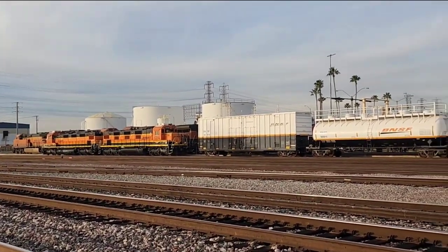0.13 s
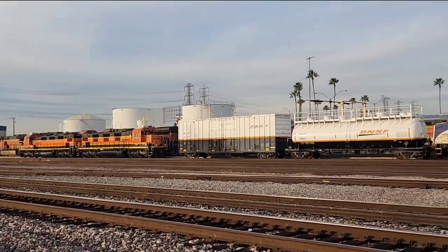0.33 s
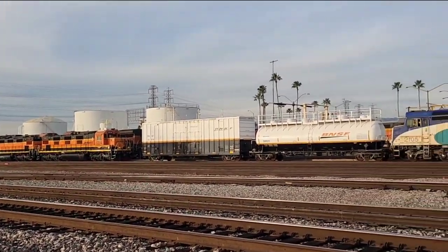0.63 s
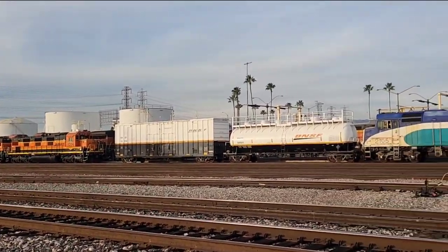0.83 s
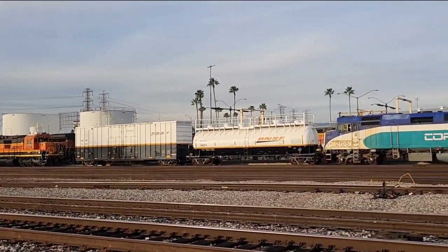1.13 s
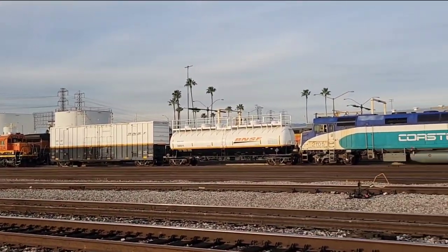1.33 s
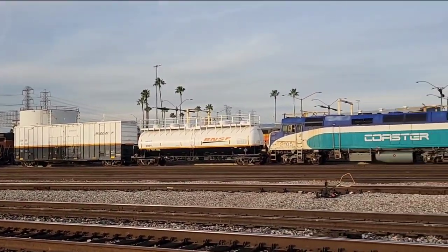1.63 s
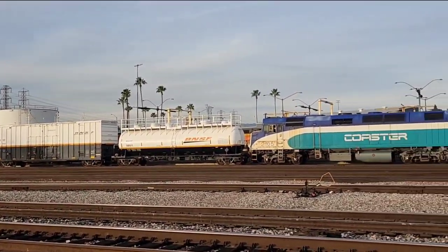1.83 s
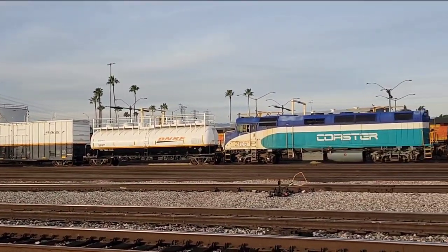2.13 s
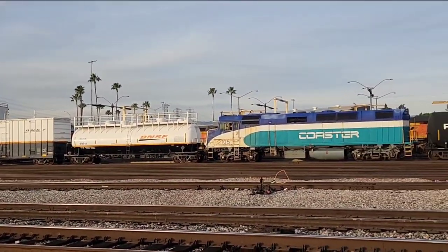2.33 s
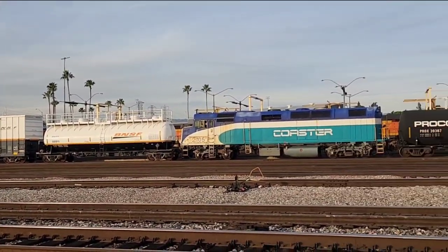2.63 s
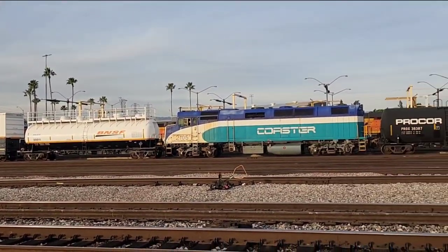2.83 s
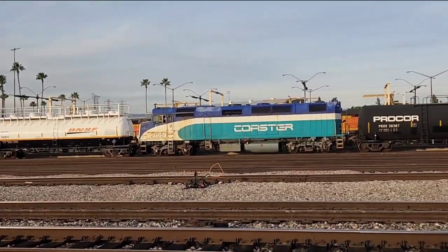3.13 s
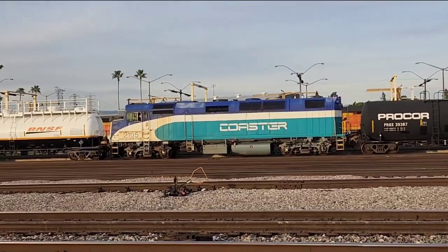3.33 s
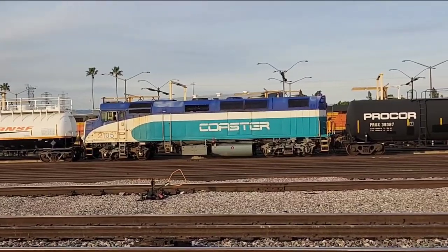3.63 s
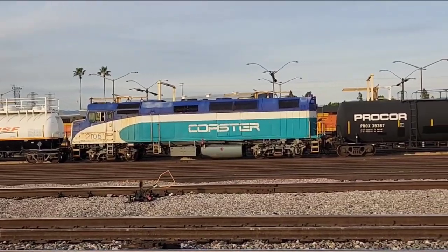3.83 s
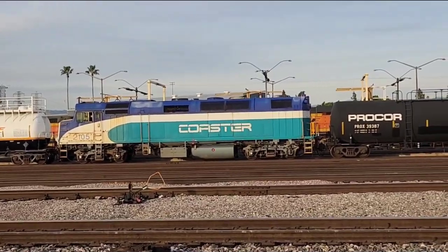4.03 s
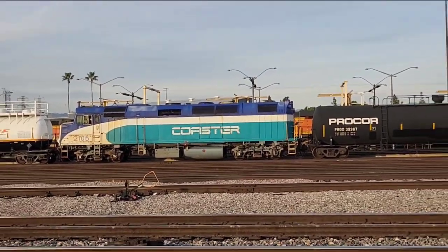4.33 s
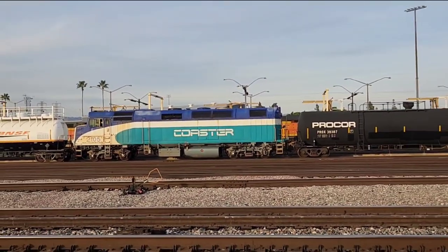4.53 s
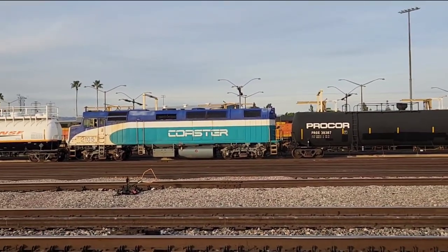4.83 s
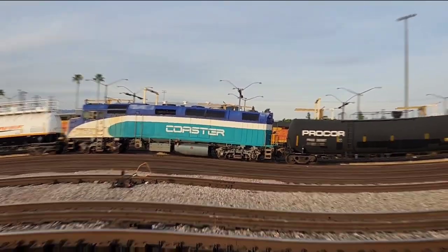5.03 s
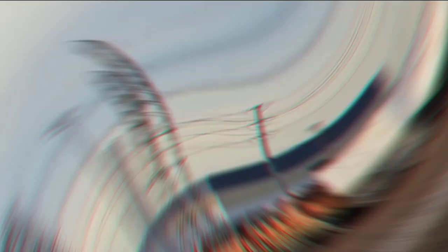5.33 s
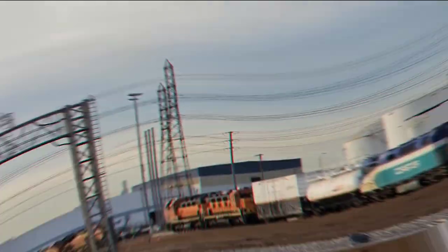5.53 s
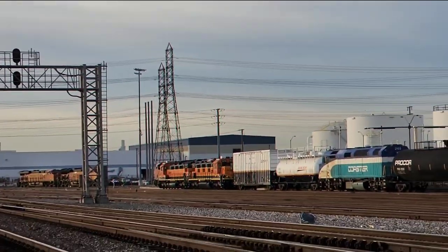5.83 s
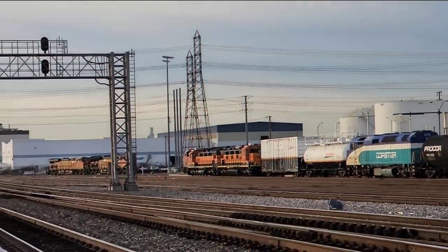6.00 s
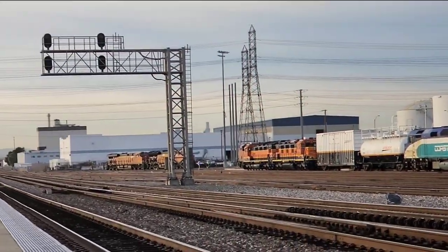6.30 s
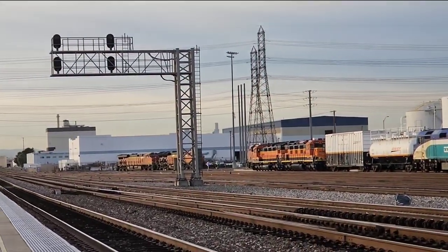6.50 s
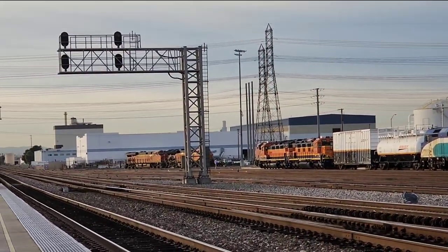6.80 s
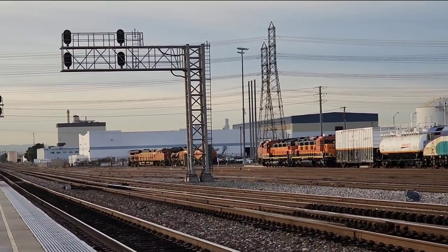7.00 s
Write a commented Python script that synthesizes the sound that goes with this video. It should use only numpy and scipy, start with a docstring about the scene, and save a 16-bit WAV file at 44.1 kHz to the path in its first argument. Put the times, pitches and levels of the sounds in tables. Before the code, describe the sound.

Handheld stereo camera near slow freight locomotives. Heavy low exhaust surges and lulls beneath wheel noise and a bright air leak, with brake rubbing and three hoarse air dryer spits. Around five and a half seconds the sound snaps almost silent for an instant, then resumes without the leak: a fading horn echo, running gear knocks, receding rumble and one crisp handling tick.

```python
"""A freight train rolls slowly through a yard close by: diesel tones and roar throb over coloured wheel noise.
A squeak and a rub of brake shoes open it; noise jets make an air leak and three air dryer spits, fans swell,
and a wheel flange, narrow-band noise, sings faintly. At 5.4 s the sound breaks off for an instant and the scene
changes: the leak is gone, the train draws away, sine partials of a horn echo die across the yard, knocks of the
running gear go on, and something ticks on the camera body by the right microphone port."""
import sys
import numpy as np
from scipy import signal
from scipy.fft import rfft, irfft
from scipy.io import wavfile
from scipy.ndimage import uniform_filter1d, minimum_filter1d

SR = 44100
rng = np.random.default_rng(int(sys.argv[2]) if len(sys.argv) > 2 else 0)


def to_wav(sig):
    """Store sig (one row per channel, or 1-D mono) as 16-bit WAV at the path in sys.argv[1].

    Samples outside -1..1 are clipped; the rate is SR.
    """
    pcm = np.clip(np.atleast_2d(sig), -1, 1) * 32767
    pcm = np.round(pcm).astype(np.int16)
    wavfile.write(sys.argv[1], SR, pcm.T)  # frames by channels


N = 315756
T, HZ = np.arange(N) / SR, np.fft.rfftfreq(N, 1 / SR)

BREAK_S, RESUME_S = 5.4048, 5.438
EDGE_HZ = 14800  # upper band limit

# All colours below are relative spectra; the sources set their own levels.
# Tick on the camera body. Each row: frequency in Hz, density in dB per Hz.
TICK_COLOUR = [(3000, -5), (5000, 4), (7500, -1), (9500, -4), (12000, -2), (14500, -10)]
TICK_S, TICK_DB, TICK_RISE_S, TICK_T60_S = 6.162, -43, .002, .03

# Faint thin treble hiss, strongest near 4.5 kHz, with a second peak near 9.4 kHz. Each row: frequency in Hz,
# density in dB per Hz.
THIN_HISS_COLOUR = [(4500, 12), (6000, -24), (7400, -9), (8000, -7.5), (8600, -13), (9400, -0.5),
                    (9800, -10), (10500, -21)]
THIN_HISS_DB, THIN_HISS_FADES_S, THIN_HISS_FADE_DB_PER_S = -52.5, 5.93, 26

# Partials of the horn chord across the yard.
# Each row: frequency in Hz, loudest moment in seconds, rms level there in dB before waver, t60 in seconds.
HORN = [(265, 5.46, -39.5, 2.2), (310, 5.53, -34, 1), (364, 5.47, -34, .9), (465, 5.55, -42, 1.5),
        (510, 5.5, -40, 1.3), (533, 5.55, -40.5, 1.2), (548, 5.53, -42, .8), (627, 5.53, -32, .7),
        (732, 5.7, -42, .8), (808, 5.46, -38.5, 1), (936, 5.48, -32, .6), (948, 5.64, -38.5, .9),
        (1010, 5.47, -41, 1), (1048, 5.55, -34.5, .85), (1090, 5.5, -41, .7), (1260, 5.68, -46, 1.2),
        (1310, 5.47, -35, .7), (1394, 5.64, -36, .75), (1445, 5.56, -40.5, 1), (1500, 5.56, -44, .6),
        (1542, 5.6, -45, .7), (1567, 5.55, -37.5, .55), (1660, 5.55, -46, .7), (1835, 5.48, -38, .35),
        (1878, 5.49, -39, .55), (1890, 5.69, -46, .9), (2095, 5.55, -50, 1), (2160, 5.55, -48, 1),
        (2340, 5.52, -50, 1)]
HORN_RISE_DB_PER_S, HORN_SMEAR_RADIANS = 48, .5

# Steady leak of compressed air. Each row: frequency in Hz, density in dB per Hz.
LEAK_COLOUR = [(900, -11), (1800, 3.5), (2600, 1.5), (3100, 1.5), (3900, -0.5), (4900, -0.5), (5500, -2),
               (6100, -3), (6900, -7), (7400, -5), (8400, -9.5), (9200, -22.5), (10000, -43.5)]
# Whistles within the leak. Each row: frequency in Hz, width in Hz, lift in dB.
LEAK_WHISTLES = [(4350, 47, 0), (4770, 100, 4), (5650, 180, 3.5), (7480, 120, 3)]
LEAK_DB, LEAK_GROWTH_DB_PER_S = -38.5, 0.09  # slowly coming closer

# Air dryer jets. Each row: frequency in Hz, density in dB per Hz.
SPIT_COLOUR = [(300, -25.5), (800, -4.5), (1800, 2.5), (2500, 0.5), (3500, 2.5), (4200, -0.5), (5200, -3),
               (6000, -7), (6800, -8.5), (8200, -8.5), (9300, -26), (10400, -46)]
# Air dryer spits. Each row: full flow in seconds, rise from about -10 dB in seconds, hold in seconds,
# t60 in seconds, jet level in dB, tilt in dB per octave, nozzle in Hz, glide in octaves per second,
# nozzle level in dB against the jet.
SPITS = [(0.395, 0.036, 0.035, 0.88, -31.5, 9, 5360, -.5, -5),
         (1.852, 0.12, 0.079, 0.61, -29.5, -4.5, 5085, .2, -8.5),
         (3.237, .08, 0.079, 1.33, -31, 0, 4750, -.5, -9)]
NOZZLE_WIDTH_HZ = 960
SPATTER_DB, SPATTER_PER_S = 1.4, 170
# Very high hiss at the height of the first spit. Each row: frequency in Hz, density in dB per Hz.
HIGH_HISS_COLOUR = [(8000, -2), (10000, 2), (12500, -1), (13300, -26)]
HIGH_HISS_S, HIGH_HISS_HALF_S, HIGH_HISS_DB = 0.426, 0.022, -51

# Knocks of the running gear.
# Each row: start in seconds, push in dB, rattle in dB, centre in Hz, rattle t60 in seconds.
KNOCKS = [(2.816, -13, -37, 310, .1), (3.61, -37, -37, 582, .2), (4.594, -29, -41, 221, 0.074),
          (5.84, -22, -24, 144, 0.32), (6.14, -37, -30, 310, 0.24)]
RATTLE_RISE_S = .006

# Brake shoes. Each row: frequency in Hz, density in dB per Hz.
RUB_COLOUR = [(1000, -11), (1350, 3), (1650, 1.5), (2050, 3), (2500, -4), (4000, -13), (5500, -18),
              (7000, -16.5), (9000, -35.5), (10000, -61.5)]
# Rubs of the brake shoes. Each row: loudest moment in seconds, half length in seconds, level in dB.
RUBS = [(0, .12, -28), (.35, 0.64, -33), (2.1, 0.75, -40.5)]
# Singing flange. Each row: time in seconds, level in dB.
SINGS = [(0, -59), (.55, -53), (1, -43.5), (1.7, -42), (2.05, -40.5), (2.4, -38), (2.78, -41), (3, -48),
         (3.3, -48), (3.7, -62.5), (4.8, -58), (5.4, -70)]
SQUEAK_S, SQUEAK_HALF_S, SQUEAK_DB = .08, .042, -40
SQUEAK_HZ, SQUEAK_OCTAVES_PER_S = 7200, 3.6  # pitch at the loudest moment, and its climb

# Radiator fans of the nearest locomotive: grow until they are abreast, then hold.
FANS_DB, FANS_ABREAST_S, FANS_GROWTH_DB_PER_S = -41, 1.6, 14.5

# Drone of the engine housings. Each row: frequency in Hz, density in dB per Hz.
DRONE_COLOUR = [(70, -1), (88, -2), (105, -4), (135, -6), (160, -11), (200, -17.5), (260, -23)]
# Heavy cars shaking the ground. Each row: frequency in Hz, density in dB per Hz.
SHUDDER_COLOUR = [(8, -22), (20, -15), (26, -5.5), (31, -2.5), (42, 4), (46, -10.5)]
# Heavy wheel trucks rolling past. Each row: abreast in seconds, half length in seconds, weight from 0 to 1.
TRUCKS = [(1.472, .3, 0.1), (3.42, .1, 0.6), (3.7, 0.48, 0.3)]
# Running levels of the housings. In order: abreast in dB, drawing away in dB, lift under a heavy truck in dB.
DRONE_DB = (-30, -25.5, 5)
# Running levels of the ground shudder. In order: abreast in dB, drawing away in dB, truck lift in dB.
SHUDDER_DB = (-29, -23.5, 4)
# Running levels of the wheels, before the gain in scene(). In order: abreast in dB, drawing away in dB,
# truck lift in dB.
ROLL_DB = (-38, -32, 4)

# Wheels and machinery abreast. Each row: frequency in Hz, density in dB per Hz.
ROLL_NEAR_COLOUR = [(150, -21), (200, -5.5), (250, 0.5), (370, -0.5), (460, -0.6), (620, 0.5), (710, -5.5),
                    (800, -3), (1020, -3), (1170, -7.5), (1330, -9), (1650, -7), (2000, -29.5),
                    (2600, -34.5)]
# Wheels and machinery drawing away. Each row: frequency in Hz, density in dB per Hz.
ROLL_FAR_COLOUR = [(150, -13), (230, -7), (350, -4), (410, -6), (540, 1), (760, -3), (950, -5),
                   (1300, -8.5), (1600, -7), (2500, -12.5), (3600, -15), (5000, -20), (5700, -33),
                   (7900, -37.5), (10000, -76)]
# Resonances of the cars abreast. Each row: frequency in Hz, width in Hz, lift in dB.
ROLL_NEAR_HUM = [(376, 48, 0.5), (507, 61, -1), (595, 9.7, -2.5), (758, 41, 4), (950, 32, -2)]
# Resonances of the cars drawing away. Each row: frequency in Hz, width in Hz, lift in dB.
ROLL_FAR_HUM = [(336, 140, 7), (490, 95, 1.5), (977, 69, 4.5), (1440, 130, 1.5)]

# Exhaust roar abreast. Each row: frequency in Hz, density in dB per Hz.
EXHAUST_NEAR = [(40, -14.5), (50, -1), (58, 0.5), (68, 2), (77, -4), (86, -11), (100, -19.5)]
# Exhaust roar drawing away. Each row: frequency in Hz, density in dB per Hz.
EXHAUST_FAR = [(40, -15), (50, -2), (66, 2.5), (75, -3), (86, -11), (100, -10.5)]
# Firing tones abreast. Each row: frequency in Hz, level in dB against the exhaust roar
# (for tones below STEADY_BELOW_HZ, level within the steady deep layer).
FIRING_NEAR = [(30.9, -14), (35.75, -11), (43.5, -12), (47.15, -10), (51.55, -10), (55, -10), (62.33, -5),
               (64.98, -3), (68.22, -6), (73.1, -3.5), (78, -9.5)]
# Firing tones drawing away. Each row: frequency in Hz, level in dB as above.
FIRING_FAR = [(25.8, -9), (37.1, -11), (46.8, -8), (50.2, -4), (55.2, -5), (58.45, -3), (66, -3),
              (74.05, -3.5)]
STEADY_BELOW_HZ = 49
THROB_DB, THROB_GROWTH_DB_PER_S = -19, 0.76
BEAT_HZ, BEAT_PEAK_S, BEAT_DB = 4.87, .187, 0.5
UNEVEN_DB, UNEVEN_PER_S = 1.5, 15
# Heaviest surges, when the exhausts fall into step. Each row: peak in seconds, lift in dB.
SURGES = [(.08, 7), (.19, 3.5), (.37, 6.5), (.81, 6), (.92, 9.5), (1.03, 3.5), (1.22, 2.5), (1.43, 9),
          (1.61, 3.5), (2.04, 10.5), (2.13, 5), (2.3, 2.5), (2.42, 2.5), (2.62, 4), (2.88, 7.5), (3.14, 7),
          (3.265, 12), (3.44, 4.5), (3.52, 3), (3.879, 6), (4.03, 3.5), (4.27, 5.5), (4.51, 4), (4.73, 3.5),
          (5.005, 5), (5.129, 6.5), (5.295, 8), (5.53, 5.5), (5.741, 3.5), (6.11, 4), (6.251, 9.5),
          (6.35, 5), (6.495, 6), (6.625, 8), (6.84, 4), (6.945, 6), (7.08, 4)]
# Deepest lulls, when the exhausts cancel. Each row: lowest moment in seconds, dip in dB.
LULLS = [(.528, -7), (.87, -5), (1.099, -14), (1.35, -12), (1.91, -11.5), (2.177, -7), (2.999, -2),
         (3.36, -6.5), (3.672, -7.5), (4.17, -4), (4.42, -8.5), (4.6, -4.5), (4.94, -4), (5.06, -4.5),
         (5.22, -4.5), (5.94, -5), (6.04, -6), (6.18, -4), (6.42, -4.5), (6.7, -9)]
SURGE_S, LULL_S = 0.034, 0.027  # half lengths
LULL_SHARE = 0.3  # sag on either side of a surge, as a share of its lift

# Likeness of the two channels abreast. Each row: frequency in Hz, likeness from 0 to 1.
LIKENESS_NEAR = [(25, 0.79), (70, 1), (130, 0.9), (250, 0.95), (500, 0.88), (700, .45), (1050, .3),
                 (1300, .55), (1650, 0.11), (3600, 0.25), (5500, 0.28), (9000, 0.13)]
# Likeness of the two channels drawing away. Each row: frequency in Hz, likeness from 0 to 1.
LIKENESS_FAR = [(250, 1), (500, 0.57), (1000, 0.55), (2300, 0.5), (3600, 0.6), (4700, 0.82), (5600, .25),
                (9000, .2)]
# Left microphone port over right, abreast. Each row: frequency in Hz, difference in dB.
PORTS_NEAR = [(60, 0.6), (550, 1), (800, 0.7), (1300, 1.5), (2000, 0.5), (3100, -0.5), (3900, -5.5),
              (4400, -12), (4800, -14.5), (5200, -15), (5800, -8.5), (6500, -4.5), (8100, -3), (8900, 4),
              (10500, -6)]
# Left port over right, drawing away. Each row: frequency in Hz, difference in dB.
PORTS_FAR = [(60, .6), (300, 1.2), (540, 2.9), (1000, 0.98), (2900, 1), (4400, 3.8), (4900, 11.7),
             (5600, 7.7), (6600, 16), (9000, 24.3)]
# Left port ahead of right, abreast. Each row: frequency in Hz, lead in radians.
LEAD_NEAR = [(20, .13), (60, .12), (130, -.02), (450, -.15), (650, -1), (900, -.2), (1100, -2.3),
             (1400, -3), (2100, -3.6), (2500, -6), (3000, -7), (3300, -4.7), (3850, -3.8), (4500, -5.2),
             (5500, -6.2), (6200, -5.9), (7300, -4), (8500, -2.9)]
# Left port ahead of right, drawing away. Each row: frequency in Hz, lead in radians.
LEAD_FAR = [(20, .13), (60, .12), (130, -.05), (400, -.5), (1000, -1.3), (2240, -3), (4390, -7.5),
            (5250, -10), (7240, -14.4), (9000, -17)]


def amp(db):
    """Decibels to gain."""
    return 10 ** (np.asarray(db) / 20)


def read(points):
    """A spectrum joined by straight lines on a log-frequency axis."""
    hz, value = np.transpose(points)
    return np.interp(np.log(HZ + 1), np.log(hz + 1), value)


def shape(points):
    """A spectrum in dB that falls 48 dB per octave beyond its ends."""
    octaves_outside = np.abs(np.log2((HZ + 1) / np.clip(HZ + 1, points[0][0], points[-1][0])))
    return read(points) - 48 * octaves_outside


def ring(hz, width):
    """Response in dB of a steep resonance."""
    return -20 * np.log10(1 + (2 * (HZ - hz) / width) ** 2)


def bumps(rows):
    """Lift in dB from a set of resonances."""
    return sum(db / (1 + (2 * (HZ - hz) / width) ** 2) for hz, width, db in rows)


def level(curve):
    """A dB curve as a gain for every sample."""
    return amp(np.interp(T, *np.transpose(curve)))


def swell(s, half_s):
    """A smooth rise to 1 at time s, and fall."""
    return np.exp(-np.minimum(((T - s) / half_s) ** 2, 100))


def swells(rows):
    """Gain of separate swells whose powers add."""
    return np.sqrt(sum((amp(db) * swell(s, half_s)) ** 2 for s, half_s, db in rows))


def unit(x):
    """Scales to rms 1."""
    return x / np.sqrt(np.mean(x ** 2) + 1e-20)


def drift(rate):
    """Slow chance of rms 1, up to rate turns a second."""
    knots = rng.standard_normal(4096)
    return unit(np.interp(2 * rate * T, np.arange(len(knots)), knots))


def noise(colour_db, likeness=LIKENESS_NEAR):
    """Coloured stereo noise of rms 1, shared between the channels as far as the likeness says."""
    a, b = rfft(rng.standard_normal((2, N)))
    same = np.clip(read(likeness), -1, 1)
    right = same * a + np.sqrt(1 - same ** 2) * b
    return unit(irfft(np.array([a, right]) * amp(colour_db), N))


def steadied(x, smooth_s):
    """Evens out the chance swells of a low roar."""
    size = int(smooth_s * SR)
    power = uniform_filter1d(uniform_filter1d((x ** 2).mean(0), size), size // 2)
    return x / np.sqrt(power + 1e-6)


def running(near_db, far_db, truck_db):
    """Gain of a running noise: steady on each side of the break, lifted as heavy trucks pass."""
    load = sum(weight * swell(s, half_s) for s, half_s, weight in TRUCKS)
    return amp(np.where(T < RESUME_S, near_db + truck_db * load, far_db))


def tick(snap_db=4, snap_s=0.00028, tail_db=-19, tail_t60=.35, left_db=-15):
    """A crisp tick on the camera body: a brief scrape, a snap and a faint tail, weaker on the left."""
    age = np.maximum(T - TICK_S, 0)
    rise = swell(TICK_S, TICK_RISE_S) ** (T < TICK_S)
    scrape = amp(-60 * age / TICK_T60_S)
    tail = amp(tail_db - 60 * age / tail_t60)
    snap = amp(snap_db) * swell(TICK_S, snap_s)
    envelope = rise * (scrape + tail) + snap
    return noise(shape(TICK_COLOUR)) * envelope * amp([[TICK_DB + left_db], [TICK_DB]])


def thin_hiss():
    """A faint thin treble hiss, strongest near 4.5 kHz with a second peak near 9.4 kHz, that holds and then
    fades."""
    fade_db = THIN_HISS_FADE_DB_PER_S * np.maximum(T - THIN_HISS_FADES_S, 0)
    return noise(shape(THIN_HISS_COLOUR)) * amp(THIN_HISS_DB - fade_db)


def horn_echo(hold_s=0.066, waver_db=3.5, scatter_db=-36.0, scatter_t60=2.1):
    """Echoes from tanks and sheds cross: each partial crests in its own time and wavers over a scattered wash."""
    wash = noise(shape([(300, -16), (600, -6.0), (1100, 7.5), (1500, -1.5), (2000, 0), (2450, -17)]))
    out = wash * amp(scatter_db - 60 * np.maximum(T - RESUME_S - hold_s, 0) / scatter_t60)
    start = int(RESUME_S * SR)
    t = T[start:]
    knots_s = RESUME_S + np.arange(60) / 30
    for hz, crest_s, db, t60 in HORN:
        turns = hz * t + rng.random()
        arch_db = np.minimum(HORN_RISE_DB_PER_S * (t - crest_s), 60 * (crest_s - t) / t60)
        for port in out:  # each channel wavers on its own
            waver, phase = (np.interp(t, knots_s, k) for k in rng.standard_normal((2, len(knots_s))))
            tone = np.sqrt(2) * np.sin(2 * np.pi * turns + HORN_SMEAR_RADIANS * phase)
            port[start:] += tone * amp(db + arch_db + waver_db * waver)
    return out


def leak(flutter_db=.5):
    """Compressed air escapes as steady turbulent noise with fuzzy whistles."""
    hiss = noise(shape(LEAK_COLOUR) + bumps(LEAK_WHISTLES))
    return hiss * amp(LEAK_DB + LEAK_GROWTH_DB_PER_S * T + flutter_db * drift(22))


def spatter():
    """Drops of condensate break up a jet into coarse grains: a gain of rms 1."""
    return unit(amp(SPATTER_DB * drift(SPATTER_PER_S)))


def spits():
    """A valve opens, blows and dies away; its nozzle whistles hoarsely and glides with the pressure."""
    out = 0
    for s, rise, hold, t60, db, tilt_db, hz, glide, nozzle_db in SPITS:
        opening = np.exp(-(np.minimum(T - s, 0) / rise * 1.07) ** 2)
        flow = opening * amp(db - 60 * np.maximum(T - s - hold, 0) / t60)
        jet = noise(shape(SPIT_COLOUR) + tilt_db * np.log2(HZ + 1))
        whistle = signal.hilbert(noise(2 * ring(hz, 2 * NOZZLE_WIDTH_HZ)))
        # shift the whole whistle band along the glide
        shift_hz = hz * (2 ** (glide * np.clip(T - s, -rise, t60 / 2)) - 1)
        nozzle = (whistle * np.exp(2j * np.pi * np.cumsum(shift_hz) / SR)).real
        out = out + (jet + amp(nozzle_db) * nozzle) * flow * spatter()
    return out


def high_hiss():
    """A brief grainy burst of very high hiss at the first spit's height."""
    burst = noise(shape(HIGH_HISS_COLOUR)) * swell(HIGH_HISS_S, HIGH_HISS_HALF_S)
    return burst * amp(HIGH_HISS_DB) * spatter() ** 2


def knocks(spread=0.33, dull_db=15):
    """Couplers and trucks knock: one compact push, then a rattle in heavily damped steel."""
    out = 0
    for s, push_db, rattle_db, hz, t60 in KNOCKS:
        half_s = 1 / (np.pi * hz)
        push = (2 * ((T - s) / half_s) ** 2 - 1) * swell(s, half_s)
        steel_db = ring(hz, spread * hz) - dull_db * np.maximum(HZ / hz - 2, 0)
        peak_s = s + RATTLE_RISE_S
        rise = swell(peak_s, RATTLE_RISE_S) ** (T < peak_s)
        rattle = noise(steel_db) * rise * amp(-60 * np.clip((T - s) / t60, 0, 2))
        out = out + amp(push_db) * push + amp(rattle_db) * rattle
    return out


def brake_rub():
    """Brake shoes rub on the wheels: swells of rough friction noise."""
    return noise(shape(RUB_COLOUR)) * swells(RUBS)


def flange(hz=3570, width=335, waver_db=0.8):
    """One flange sings in a fuzzy wheel mode, a narrow band of wavering noise."""
    return noise(ring(hz, width)) * level(SINGS) * amp(waver_db * drift(24))


def squeak(roughness_per_s=170):
    """A wheel squeaks once: a rising sine, roughened by chance."""
    turns = np.cumsum(SQUEAK_HZ * 2 ** (SQUEAK_OCTAVES_PER_S * (T - SQUEAK_S))) / SR
    tone = drift(roughness_per_s) * unit(np.sin(2 * np.pi * turns))
    return tone * amp(SQUEAK_DB) * swell(SQUEAK_S, SQUEAK_HALF_S)


def fans(hz=970, width=420):
    """A broad roar from the radiator fans."""
    return noise(ring(hz, width)) * amp(FANS_DB - FANS_GROWTH_DB_PER_S * np.maximum(FANS_ABREAST_S - T, 0))


def drone(waver_db=0.2, lurch_db=4.5):
    """Low roar of the engine housings, and the ground shuddering under the cars."""
    housings = steadied(noise(shape(DRONE_COLOUR)), 0.079)
    housings = housings * running(*DRONE_DB) * amp(waver_db * drift(9.8))
    ground = steadied(noise(shape(SHUDDER_COLOUR)), 0.087)
    ground = ground * running(*SHUDDER_DB) * amp(lurch_db * drift(3.4))
    return housings + ground


def rolling(colour, hums, likeness, gain_db, flutter_db):
    """Rough wheels on rail excite the broad resonances of the cars."""
    roar = noise(shape(colour) + bumps(hums), likeness)
    return roar * running(*ROLL_DB) * amp(gain_db + flutter_db * drift(23))


def throb():
    """Gain of the exhaust: a regular beat, chance unevenness, surges with a sag on either side, and deep lulls."""
    beat = BEAT_DB * np.cos(2 * np.pi * BEAT_HZ * (T - BEAT_PEAK_S))
    surge = 0
    for s, db in SURGES:
        surge = surge + db * ((1 + LULL_SHARE) * swell(s, SURGE_S) - LULL_SHARE * swell(s, 3 * SURGE_S))
    lull = sum(db * swell(s, LULL_S) for s, db in LULLS)
    in_step = np.minimum(sum(swell(s, SURGE_S) for s, db in SURGES), 1)
    uneven = UNEVEN_DB * drift(UNEVEN_PER_S) * (1 - in_step)
    return amp(THROB_DB + THROB_GROWTH_DB_PER_S * T + beat + surge + lull + uneven)


def diesels(colour, firing, gain_db, smooth_s=0.11, deep_db=-21.5):
    """Firing tones beat inside the exhaust roar and follow the throb; the deepest hold steady beneath it."""
    beating, deep = noise(shape(colour)), 0
    for (hz, db), turn in zip(firing, rng.random(len(firing))):
        tone = amp(db) * unit(np.sin(2 * np.pi * (hz * T + turn)))
        if hz < STEADY_BELOW_HZ:
            deep = deep + tone
        else:
            beating = beating + tone
    return (steadied(beating, smooth_s) * throb() + amp(deep_db) * deep) * amp(gain_db)


def reflected(x, echo=0.34, latest_s=.04, across_s=.0004, count=14):
    """Ballast, rails and car sides send early echoes that ripple the spectrum, a little apart at the two ears."""
    taps = np.zeros((2, SR // 8))
    for when, side, sign in rng.uniform(-1, 1, (count, 3)):
        delay_s = latest_s * abs(when) + .002
        for port, way in zip(taps, (-1, 1)):
            port[int((delay_s + way * side * across_s) * SR)] += np.sign(sign) * echo / np.sqrt(count)
    taps[:, 0] = 1  # direct sound
    soft_ends = signal.windows.tukey(N, .002)
    return signal.oaconvolve(x * soft_ends, taps, axes=1)[:, :N] / np.sqrt(1 + echo ** 2)


def ports(x, balance, leads, left_share):
    """The two microphone ports differ in colour and timing; near the train the right is stronger around 5 kHz."""
    difference_db, lead = read(balance), read(leads)
    left = amp(left_share * difference_db) * np.exp(.5j * lead)
    right = amp((left_share - 1) * difference_db) * np.exp(-.5j * lead)
    soft_ends = signal.windows.tukey(N, .002)
    return irfft(rfft(x * soft_ends) * np.array([left, right]), N)


def scene(recede_db_per_s=1.6):
    """Abreast of the train, then a brief near-silence, then the train drawing away."""
    body = knocks() + drone()

    near = leak() + spits() + high_hiss() + brake_rub() + flange() + squeak() + fans()
    near = near + rolling(ROLL_NEAR_COLOUR, ROLL_NEAR_HUM, LIKENESS_NEAR, gain_db=6.0, flutter_db=0.75)
    near = reflected(near) + diesels(EXHAUST_NEAR, FIRING_NEAR, gain_db=0.0) + body
    near = ports(near, PORTS_NEAR, LEAD_NEAR, left_share=0)

    far = rolling(ROLL_FAR_COLOUR, ROLL_FAR_HUM, LIKENESS_FAR, gain_db=5.0, flutter_db=0.93)
    far = far * amp(-recede_db_per_s * (T - RESUME_S)) + thin_hiss()
    far = reflected(far) + diesels(EXHAUST_FAR, FIRING_FAR, gain_db=-0.9) + body
    far = ports(far, PORTS_FAR, LEAD_FAR, left_share=0.33) + horn_echo() + tick()

    # the sound snaps off, dies to almost nothing, then returns at once
    fade = level([(BREAK_S - .0001, 0), (BREAK_S + .0002, -20), (RESUME_S, -46)])
    return np.where(T < RESUME_S, near * fade, far)


def record(dry, ceiling=0.84):
    """The camera's limiter eases down the tallest peaks; then the band limit."""
    size = SR // 50
    allowed = minimum_filter1d(ceiling / np.maximum(np.abs(dry).max(0), ceiling), 2 * size)
    limited = dry * uniform_filter1d(uniform_filter1d(allowed, size), size)
    band_limit = signal.firwin(151, EDGE_HZ, window=("kaiser", 8), fs=SR)
    return signal.oaconvolve(limited, band_limit[None], "same")


dry = scene()
out = record(dry)
to_wav(out)
```